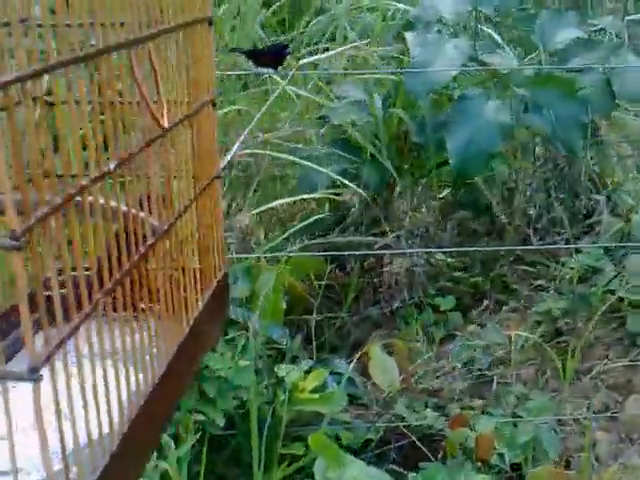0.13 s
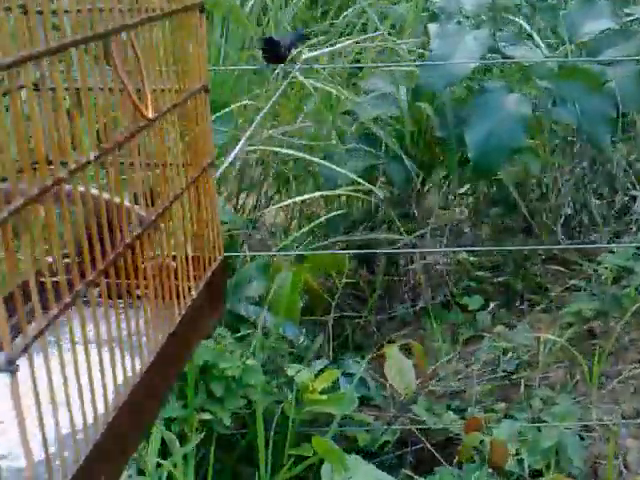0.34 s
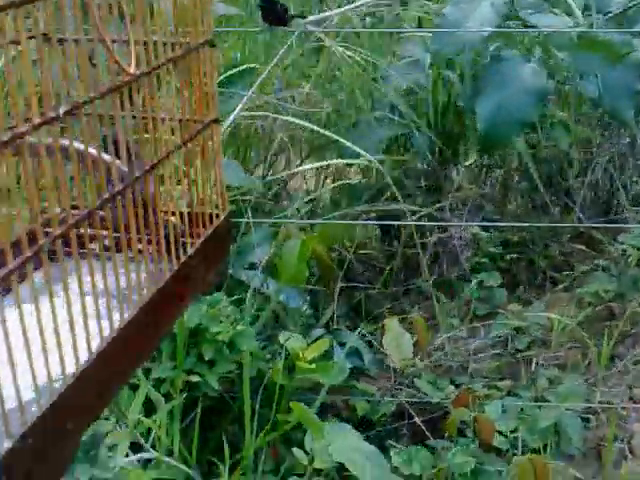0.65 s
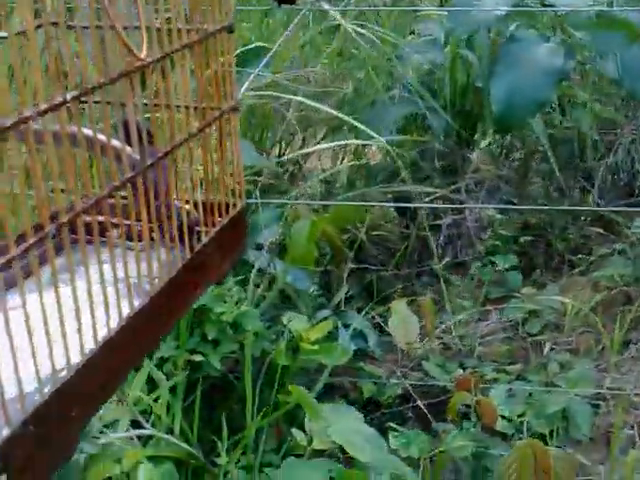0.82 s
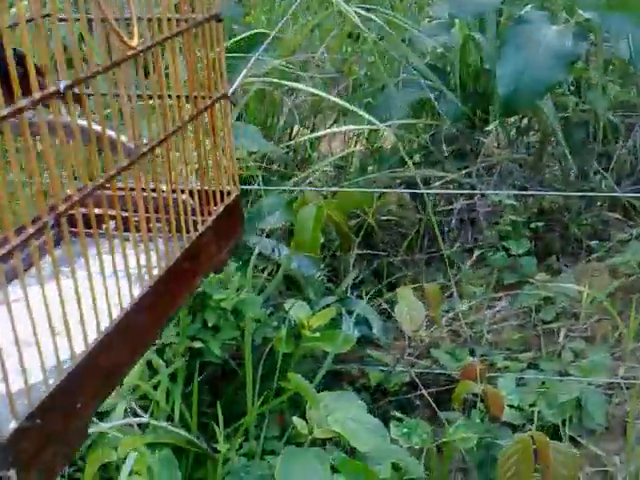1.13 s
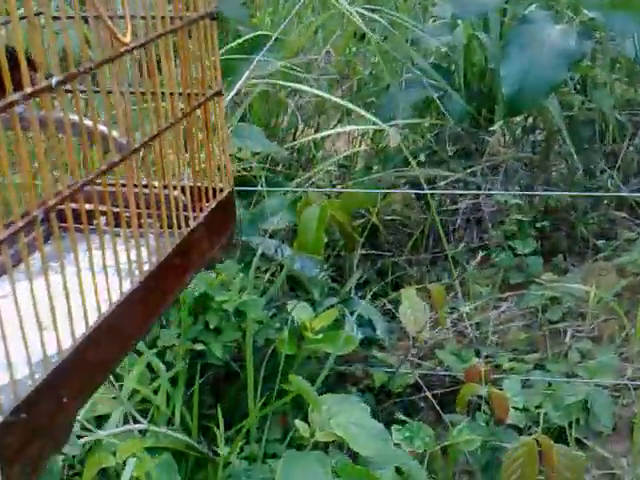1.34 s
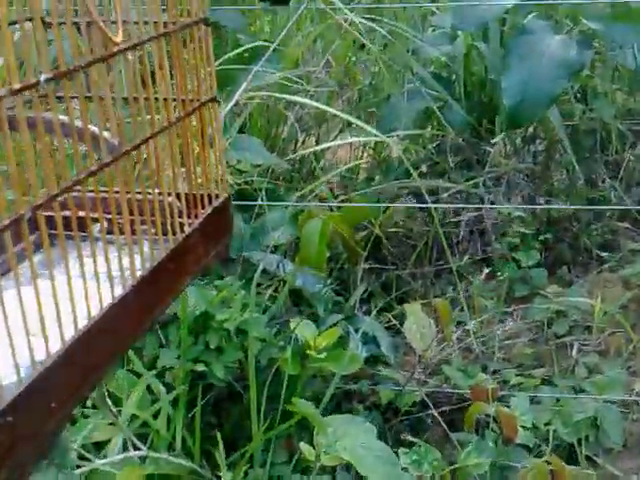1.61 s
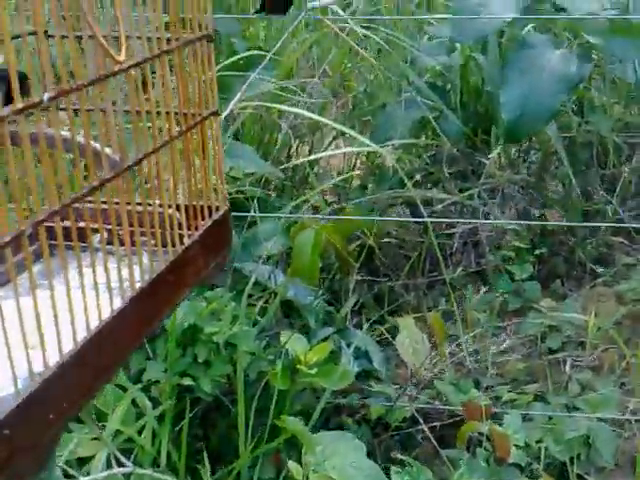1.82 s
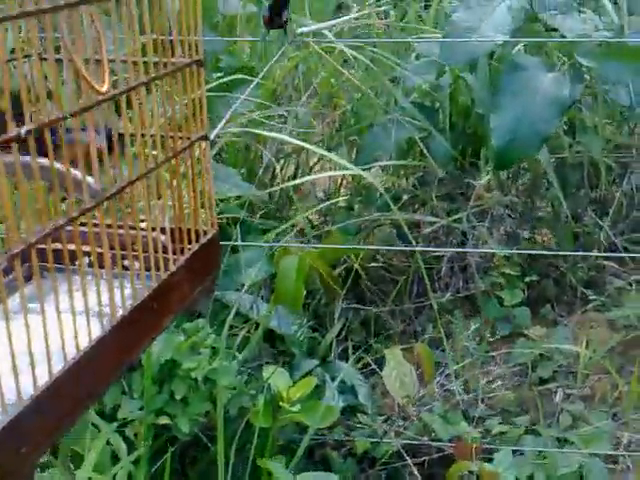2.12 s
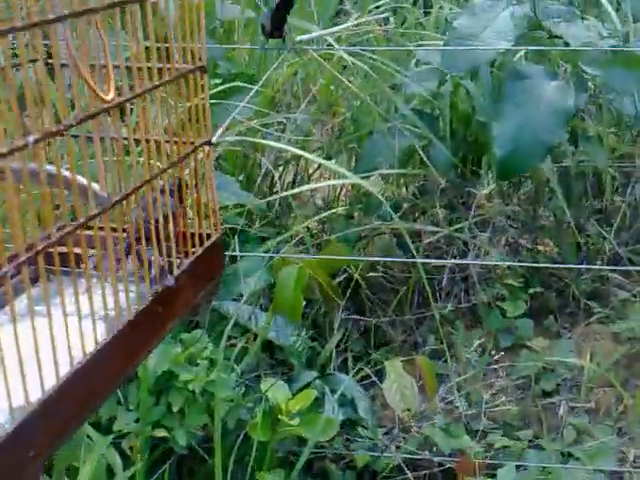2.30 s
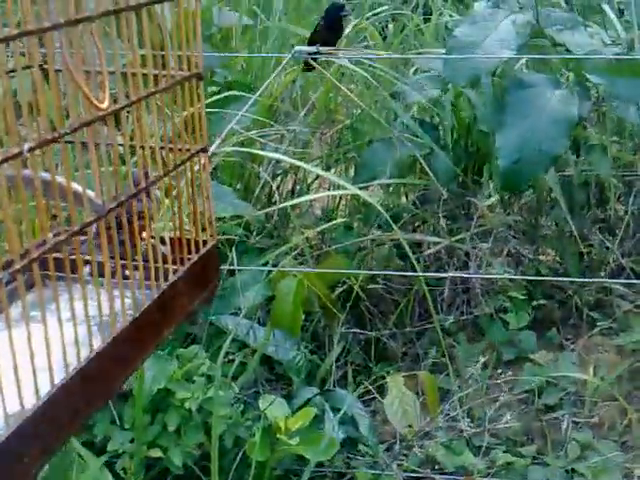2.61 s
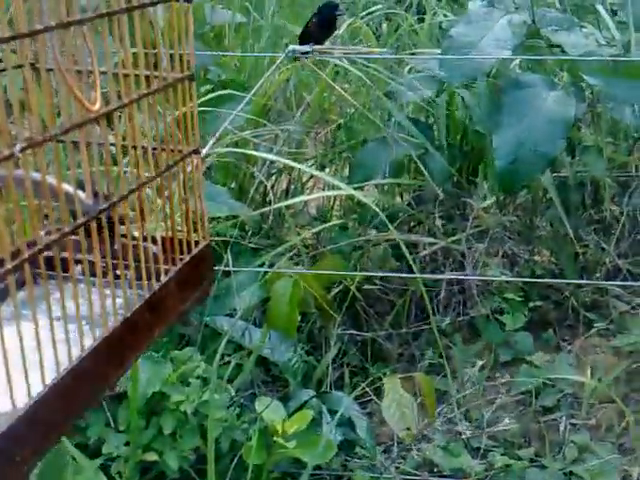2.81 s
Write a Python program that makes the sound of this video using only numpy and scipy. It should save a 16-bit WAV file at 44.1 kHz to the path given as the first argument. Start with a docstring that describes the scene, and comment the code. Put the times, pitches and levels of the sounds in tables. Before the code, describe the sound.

Sharp, kiss-like bird chips, close and dry, squeak downward into hiss: three at 0.2-0.6 s, four at 1.15-1.65, three at 2.3-2.7. A faint, farther whistle slides down from 0 to 0.4, another at 0.65. Low wind thumps the microphone, strongest around 0.5-0.9, easing after 1.6. Light wooden cage ticks, soft scuffs and tiny peeps follow; a thin high insect trill peaks near 2.35.

```python
"""A garden edge beside a bird cage. A falling whistle from a small, farther bird comes first, over faint outdoor air.
Soon three sharp, kiss-like chips sound close by: gliding squeaks that break into hiss, some opened by a smack.
Wind bumps the microphone through the first half, and a second whistle falls after the first three chips.
Runs of four and then three chips follow, with light cage ticks, soft scuffs and a few tiny peeps.
A high insect trill, one tone pulsed by wing strokes, rises and dips early on and is loudest towards the end."""
import sys
import numpy as np
from scipy import signal
from scipy.fft import rfft, irfft, next_fast_len
from scipy.io import wavfile
from scipy.ndimage import map_coordinates

SR = 44100
rng = np.random.default_rng(int(sys.argv[2]) if len(sys.argv) > 2 else 0)


def dump_mix(stems):
    """Bounce the given channels to the path in sys.argv[1] as a 16-bit WAV at rate SR."""
    frames = np.atleast_2d(stems).T  # one column per channel
    limited = np.clip(frames, -1, 1)  # hard clip at full scale
    pcm = np.round(limited * 32767).astype(np.int16)
    wavfile.write(sys.argv[1], SR, pcm)


N = 130095  # length in samples

# The close chips. Each row: moment of breaking up in seconds, then lists of times in seconds,
# pitches in Hz, squeak levels in dB and air levels in dB.
CHIPS = [
    [.246, (.211, .215, .223, .230, .241, .250, .258), (2450, 1950, 1550, 1210, 1000, 730, 510),
     (-48, -28, -25, -34.5, -26, -37, -44.5), (-23.5, -27, -27, -33, -33, -31.5, -38)],
    [.393, (.361, .371, .384, .393, .401, .410, .419, .429), (2080, 1780, 1520, 1600, 1330, 1250, 560, 420),
     (-40.5, -29.5, -23.5, -21, -29, -31, -37.5, -42), (-28, -28, -24.5, -22.5, -23, -28, -32, -35)],
    [.551, (.514, .521, .541, .552, .562, .572, .580, .587), (1280, 1320, 1180, 1280, 1580, 900, 480, 400),
     (-45, -39.5, -34.5, -31, -20.5, -33, -36, -46.5), (-42, -36, -25.5, -25, -21.5, -23, -30, -32.5)],
    [1.222, (1.147, 1.151, 1.164, 1.175, 1.188, 1.202, 1.211, 1.218),
     (1950, 2100, 1730, 1440, 1290, 1450, 1720, 2100), (-33, -33.5, -22.5, -31, -32.5, -37, -34, -47),
     (-32, -28, -28, -26.5, -25, -31.5, -30.5, -39)],
    [1.372, (1.290, 1.302, 1.310, 1.334, 1.354, 1.374, 1.385, 1.388),
     (1780, 1600, 1570, 1130, 1000, 1140, 1600, 1850), (-39.5, -28, -27, -32.5, -32, -42.5, -45, -38.5),
     (-28.5, -29, -25, -27, -35, -46, -43, -60)],
    [1.483, (1.455, 1.468, 1.480, 1.495, 1.508, 1.518), (1420, 1230, 1140, 970, 680, 440),
     (-44, -35, -34, -33.5, -42.5, -45.5), (-27.5, -29, -30, -33.5, -35.5, -35)],
    [1.647, (1.609, 1.624, 1.642, 1.659, 1.665, 1.684), (1340, 1200, 1040, 980, 720, 450),
     (-51, -42, -31, -37.5, -41, -61), (-41, -41, -33.5, -36.5, -28.5, -40.5)],
    [2.345, (2.319, 2.326, 2.333, 2.341, 2.349, 2.358), (1980, 1720, 1320, 970, 760, 520),
     (-29, -26, -29, -29, -38, -44), (-26.5, -25, -26.5, -31.5, -34, -35)],
    [2.506, (2.465, 2.472, 2.483, 2.495, 2.505, 2.520, 2.533, 2.540),
     (1800, 1400, 1120, 990, 910, 770, 480, 400), (-46, -45, -41, -30, -26.5, -36, -50, -60),
     (-34, -33.5, -33, -29, -31.5, -30.5, -33, -45)],
    [2.664, (2.636, 2.645, 2.668, 2.679, 2.690, 2.702, 2.715), (1600, 1280, 1070, 1110, 970, 720, 470),
     (-47, -47.5, -37.5, -35, -29.5, -47, -62), (-44, -30.5, -31, -31, -24, -28.5, -37.5)],
]
# The cavity that colours every squeak. Each row: frequency in Hz, relative level in dB.
CAVITY = [(400, 17), (750, -1.5), (1100, -0.5), (1800, 2), (2600, -6), (3200, -33.5), (5000, -37)]
# Overtones that the air drives until a chip breaks up. Each row: frequency in Hz, relative level in dB.
OVERTONES = [(1600, -14), (3000, -8), (3900, 0), (5000, -2), (6300, 0), (8000, -9), (11500, -7),
             (16000, -24)]
OVERTONE_DB = -5.5  # overtones against the air level
# Random pitch scatter as a share, random points per second, level scatter in dB.
JITTER, JITTER_RATE, SHIMMER_DB = .008, 900, 1.2
# Each overtone wanders in level (dB, up to about 1.5 times this when high) and phase (radians).
FLUTTER_DB, FLUTTER_RAD, FLUTTER_RATE = 2, 0.71, 115.2  # the last is random points per second
# Breaking up: time scale in seconds, extra pitch scatter as a share, depth of period doubling.
BREAK_S, ROUGH_JITTER, ROUGH_SPLIT = .003, .022, .3
EDGE_S, RELEASE_S = .002, .012  # fade in and fade out of a chip or whistle

# The hiss of the chips. Each row: frequency in Hz, relative level in dB per Hz.
HISS = [(300, -30), (800, -23), (1600, -0.5), (2900, -11.5), (4200, 0), (5200, -4.5), (6400, 1),
        (8000, -5.5), (10500, -1), (11700, 0.5), (12700, -1.5), (13600, -2.5), (15000, -14), (16500, 3)]
# The hollow low part of the hiss. Each row: frequency in Hz, relative level in dB per Hz.
HOLLOW = [(150, -3.5), (400, 3.5), (650, 12), (1000, -17), (2000, -22), (5000, -60)]
HOLLOW_HZ, HOLLOW_DB = 744, -12  # the hollow part enters as the pitch sinks below this
HISS_PULSING, CRACKLE_DB = 0.35, 1.1  # depth of hiss pulsing with the pitch, hiss scatter
# Below the treble, hiss is held down while the squeak is clean; the treble gains once it breaks.
CLEAN_HISS_DB, BROKEN_TREBLE_DB = -9, 1.5
# Below this air level in dB the treble fades, by so many dB for each dB, above about this Hz.
BRIGHT_DB, DULLING, TREBLE_HZ = -39, 0.84, 7900
SOFT_START_DB, OPENING_S = -23, 0.028  # a chip with no smack starts dull and opens up
# From this moment the hiss also has a narrow high resonance.
SIZZLE_FROM_S, SIZZLE_HZ, SIZZLE_WIDTH_HZ, SIZZLE_DB = 2, 12030, 680, -9.5

# Smacks that open the sharper chips. Each row: time in seconds, level in dB before SMACK_DB is added.
SMACKS = [(0.2103, -14.5), (0.3603, -15.5), (1.1463, -10), (1.2896, -15.5), (1.4543, -19.5), (2.317, -13)]
# How a smack rings. Each row: frequency in Hz, relative level in dB, time to fall 60 dB in seconds.
SMACK_MODES = [(1980, -5.5, 0.0073), (3860, 10.5, 0.0015), (5500, 13, 0.0024), (6700, 5.5, 0.0016),
               (9100, 11, 0.0028), (11570, 17, 0.0034)]
SMACK_LEAD_S, SMACK_RISE_S, SMACK_DB = 0.00018, 0.00028, -8.5  # the lead starts each smack early

# The falling whistles, one list each. Each row: time in seconds, pitch in Hz, level in dB.
WHISTLES = [
    [(0, 5780, -62), (.066, 4500, -61.5), (.12, 4020, -61), (.145, 3880, -45.5), (.21, 3585, -44),
     (.30, 3236, -43), (.385, 2950, -43)],
    [(.62, 4300, -64), (.638, 4100, -57), (.652, 3930, -46), (.71, 3540, -48), (.748, 3000, -60)],
]
# Tiny falling peeps. Each row: start in seconds, length in seconds, middle pitch in Hz, level in dB.
PEEPS = [(1.679, 0.0091, 3800, -43), (2.4, 0.011, 3290, -49.5), (2.413, 0.023, 3290, -50.5),
         (2.532, 0.011, 3980, -37), (2.714, 0.016, 3710, -42.5)]
PEEP_FALL, PEEP_JITTER = 0.068, .04  # fall over a peep and random scatter, as shares of its pitch
# The insect trill. Each row: time in seconds, pitch in Hz, level in dB.
TRILL = [(0, 7570, -78), (.5, 7430, -61), (.68, 7310, -51), (.95, 7300, -68.5), (1.4, 7390, -66),
         (1.85, 7560, -51), (2.35, 7505, -44), (2.95, 7500, -51)]
# Strokes per second, sounding share of a stroke, pitch fall in a stroke, random pitch scatter.
TRILL_RATE_HZ, TRILL_SHAPE, TRILL_SAG_HZ, TRILL_SCATTER_HZ = 74.2, 0.64, 40, 22.6

# Light knocks on the cage. Each row: time in seconds, level in dB before TICK_DB is added, favoured Hz.
TICKS = [(1.258, -26.5, 1100), (1.276, -42, 1550), (1.732, -37, 4170), (1.748, -36, 3200),
         (1.812, -35.5, 3860), (1.95, -36.5, 1370), (2.056, -23, 2440), (2.134, -34, 1610),
         (2.252, -29.5, 2500), (2.375, -34, 3000)]
# Resonances of the cage wood. Each row: frequency in Hz, width in Hz, relative level in dB.
TICK_MODES = [(1400, 620, 1.5), (2770, 230, -22), (3970, 290, -1.5), (8200, 6300, -11)]
TICK_RISE_S, TICK_T60_S, TICK_DB, TICK_SPREAD_OCT = 0.00056, 0.018, -6.5, 1  # T60: time to fall 60 dB
# Soft handling scuffs. Each row: middle in seconds, length in seconds, level in dB.
SCUFFS = [(1.27, 0.043, -39), (2.287, 0.037, -46.5)]
# Colour of the scuffs. Each row: frequency in Hz, relative level in dB.
SCUFF_COLOUR = [(80, -11), (220, 0.5), (400, -12), (600, -8), (1000, -16.5), (2500, -23.5), (8000, -39)]

# Wind on the microphone. Each row: time in seconds, level in dB.
WIND = [(0, -68), (.11, -69), (.14, -45.5), (.2, -59), (.3, -53), (.36, -45), (.44, -38), (.56, -29),
        (.7, -26.5), (.79, -38.5), (.92, -39), (.98, -32.5), (1.3, -36), (1.47, -42.5), (1.55, -54.5),
        (1.72, -47), (1.8, -58), (2.4, -62), (2.95, -64)]
# Colour of the wind. Each row: frequency in Hz, relative level in dB per Hz.
RUMBLE = [(15, -9), (35, 2.5), (75, 1), (130, -7.5), (200, -16.5), (300, -30), (500, -36.5), (1000, -55.5),
          (3000, -100)]
# Eddies that bump the microphone. Each row: middle in seconds, peak in dB, middle to peak in seconds.
BUMPS = [(0.377, -23.5, 0.0027), (0.467, -19.5, 0.0012), (0.577, -23.5, 0.0015), (0.654, -19.5, 0.0012),
         (0.683, -11.5, 0.0011), (0.825, -14.5, .0017), (0.854, -17, 0.0018), (1.025, -25.5, 0.0019),
         (1.075, -23, 0.0014), (1.334, -20, 0.0025), (1.437, -25, 0.0022), (1.465, -25, 0.0024),
         (1.587, -32.5, 0.004), (2.191, -42, 0.0034)]
# Still outdoor air. Each row: frequency in Hz, relative level in dB per Hz.
AIR = [(20, 5.5), (100, 2.5), (300, 0), (1000, -5), (1600, -1.5), (2400, -5.5), (4200, -5), (6000, -13.5),
       (7400, 4.5), (8400, -11), (12000, -14.5), (16000, -5)]
AIR_DB = -54.5
# A soft treble hiss that swells around the chips. Each row: time in seconds, level in dB.
SOFT_HISS = [(0, -115), (.2, -49.5), (.26, -42.5), (.35, -37.5), (.45, -53), (.62, -58), (1, -53.5),
             (1.14, -40), (1.26, -44.5), (1.55, -57), (1.9, -54)]

# Scatter from the foliage for near and far sounds: time to fall 60 dB, and level.
ECHO_T60_S, ECHO_DB, FAR_ECHO_T60_S, FAR_ECHO_DB = 0.096, -15, 0.35, -19.5
TOP_HZ, MIC_TOP = 16000, .45  # highest frequency kept, ceiling that rounds off peaks


def chips():
    """A gliding squeak rings a small cavity, then breaks into hiss that turns hollow as pitch sinks."""
    out, breath, hollow = np.zeros(N), noise(HISS), noise(HOLLOW)
    resonance = lambda f: 1 / (1 + ((f - SIZZLE_HZ) / SIZZLE_WIDTH_HZ) ** 2) ** 2
    sizzle = unit(filtered(rng.standard_normal(N), resonance))
    breath = breath + amp(SIZZLE_DB) * sizzle * (clock() > SIZZLE_FROM_S)
    top = filtered(breath, treble)
    body = breath - top
    for break_s, *columns in CHIPS:
        rows = np.transpose(columns)
        span = np.arange(SR // 6) + round((rows[0][0] - EDGE_S) * SR)
        t = span / SR
        hz, squeak_db, air_db = curves(rows, t)
        # Moves smoothly from 0 (clean) to 1 (broken up).
        broken = (1 + np.tanh((t - break_s) / BREAK_S / 2)) / 2
        dull = dull_db(t, air_db)
        tone, phase = squeak(t, hz, squeak_db, air_db, dull, broken)
        crackle = amp(CRACKLE_DB * wobble(JITTER_RATE, t))
        puffs = unit((1 + HISS_PULSING * np.cos(phase)) * crackle)
        hiss = amp(CLEAN_HISS_DB * (1 - broken)) * body[span]
        hiss += amp(BROKEN_TREBLE_DB * broken + dull) * top[span]
        hiss += amp(HOLLOW_DB) * hollow[span] / (1 + (hz / HOLLOW_HZ) ** 10)
        out[span] += gate(rows, t) * (tone + amp(air_db) * puffs * hiss)
    return out


def squeak(t, hz, squeak_db, air_db, dull, broken):
    """A buzzing edge and its phase: rich and clean at first, rough and bare once it breaks up."""
    phase = turn(hz * (1 + (JITTER + ROUGH_JITTER * broken) * wobble(JITTER_RATE, t)))
    k = np.arange(1, 21)[:, None]  # multiples of the pitch
    curves_per_partial = np.array([[wobble(FLUTTER_RATE, t) for _ in k] for _ in range(2)])
    wander, drift = curves_per_partial * (k > 1)  # the lowest partial stays steady
    flutter = amp(FLUTTER_DB * wander * (1.5 - 1 / k)) * (k * hz < TOP_HZ)
    low = amp(along(CAVITY, k * hz)) * flutter
    high = amp(along(OVERTONES, k * hz)) * flutter * (k > 1)
    # Even out the total strength, so the level curves alone set the loudness.
    low, high = [w / np.sqrt((w ** 2).sum(0) / 2) for w in (low, high)]
    air_drive = amp(air_db + OVERTONE_DB + dull * treble(k * hz)) * np.sqrt(1 - broken)
    weight = np.hypot(amp(squeak_db) * low, air_drive * high)
    partials = np.cos(k * phase + 2 * np.pi * rng.random(k.shape) + FLUTTER_RAD * drift)
    # At half the pitch: neighbouring cycles differ in strength.
    split = 1 + ROUGH_SPLIT * broken * np.cos(phase / 2 + drift[-1])
    shimmer = amp(SHIMMER_DB * wobble(JITTER_RATE, t))
    return (weight * partials).sum(0) * split * shimmer, phase


def dull_db(t, air_db):
    """Loss of treble when little air passes, and while a chip with no smack opens."""
    snaps = any(t[0] < s < t[0] + OPENING_S for s, _ in SMACKS)
    closed = 0 if snaps else np.maximum(1 - (t - t[0]) / OPENING_S, 0)
    return DULLING * np.minimum(air_db - BRIGHT_DB, 0) + SOFT_START_DB * closed


def treble(hz):
    """Share of a frequency that belongs to the treble."""
    return 1 - 1 / (1 + (hz / TREBLE_HZ) ** 10)


def smacks():
    """A few milliseconds of bright, fast-dying ringing as a chip snaps open."""
    out = np.zeros(N)
    t = np.arange(SR // 20) / SR
    for s, db in SMACKS:
        ring = np.zeros(len(t))
        for hz, level, t60 in SMACK_MODES:
            cycles = hz * rng.normal(1, 0.0082) * t + rng.random()  # slightly detuned each time
            ring += amp(level - 60 * t / t60) * np.sin(2 * np.pi * cycles)
        start = round((s - SMACK_LEAD_S) * SR)
        out[start:][:len(t)] += amp(db + SMACK_DB) * ring * np.minimum(t / SMACK_RISE_S, 1) ** 2
    return out


def whistles():
    """Pure, slightly wavering notes that slide down."""
    t, out = clock(), np.zeros(N)
    for rows in WHISTLES:
        hz, db = curves(rows, t)
        level = amp(db + 2.6 * wobble(72.5, t))
        tone = np.sqrt(2) * np.sin(turn(hz * (1 + 0.0037 * wobble(120.0, t))))
        out += gate(rows, t) * level * tone
    return out


def peeps():
    """Very short, falling notes, made scratchy by fast random pitch scatter."""
    t, out = clock(), np.zeros(N)
    for s, length, hz, db in PEEPS:
        u = np.clip((t - s) / length, 0, 1)  # progress through the peep
        pitch = hz * (1 - PEEP_FALL * (u - .5) + PEEP_JITTER * wobble(JITTER_RATE, t))
        out += amp(db) * np.sqrt(2) * np.sin(np.pi * u) * np.sin(turn(pitch))
    return out


def insect():
    """One high tone, pulsed by each wing stroke and sagging in pitch within it."""
    t = clock()
    hz, db = curves(TRILL, t)
    stroke = (TRILL_RATE_HZ * t) % 1  # progress through the stroke
    pulse = np.maximum(np.sin(np.pi * np.minimum(stroke / TRILL_SHAPE, 1)), 0) ** 0.3
    pitch = hz - TRILL_SAG_HZ * (stroke - .5) + TRILL_SCATTER_HZ * wobble(250, t)
    return amp(db + 0.69 * wobble(39.5, t)) * unit(pulse * np.sin(turn(pitch)))


def wood(f):
    """Resonances of the wooden cage: each is strongest at its own frequency."""
    return sum(amp(db) * (f * w) ** 2 / ((c * c - f * f) ** 2 + (f * w) ** 2) for c, w, db in TICK_MODES)


def ticks():
    """Small dry contacts ring the wooden cage, each favouring the modes near its own pitch."""
    out = np.zeros(N)
    for s, db, hz in TICKS:
        age = clock() - s
        fade_db = -60 * np.maximum(age, 0) / TICK_T60_S
        level = amp(db + TICK_DB + fade_db) * np.clip(age / TICK_RISE_S + 1, 0, 1)
        colour = lambda f: wood(f) / (1 + (np.log2((f + 1) / hz) / TICK_SPREAD_OCT) ** 2)
        out += level * unit(filtered(rng.standard_normal(N), colour))
    return out


def scuffs():
    """Brief dull rubs: low-coloured noise that swells and fades."""
    t = clock()
    level = sum(amp(db) * np.exp(-(2 * (t - s) / length) ** 2) for s, length, db in SCUFFS)
    return noise(SCUFF_COLOUR) * level


def wind():
    """Low rumble, and single eddies that suck and then push on the microphone."""
    t = clock()
    db, = curves(WIND, t)
    out = amp(db + 3.5 * wobble(30, t)) * noise(RUMBLE)
    for s, peak_db, width in BUMPS:
        u = (t - s) / width
        out += amp(peak_db) * u * (4 / (3 + u * u)) ** 2  # a dip, then an equal peak
    return out


def air():
    """Steady outdoor air and a soft swelling hiss, both coloured noise."""
    db, = curves(SOFT_HISS, clock())
    return amp(AIR_DB) * noise(AIR) + amp(db) * noise(HISS)


def foliage(x, t60):
    """A short scatter of the sound: many random reflections that die away."""
    t = np.arange(SR // 3) / SR
    tail = rng.standard_normal(len(t)) * amp(-60 * t / t60)
    return signal.fftconvolve(x, tail / np.linalg.norm(tail))[:N]


def amp(db):
    """Turn dB into a plain multiplier."""
    return 10 ** (np.asarray(db) / 20)


def clock():
    """Seconds at each sample."""
    return np.arange(N) / SR


def unit(x):
    """Scale to an average strength (rms) of 1."""
    return x / np.sqrt(np.mean(x ** 2) + 1e-20)


def along(points, hz):
    """Read a table of frequency and value, with frequency on a log axis."""
    f, v = np.transpose(points)
    return np.interp(np.log(hz + 1), np.log(f + 1), v)


def curves(rows, t):
    """Each column after the time, at the times t."""
    s, *cols = np.transpose(rows)
    return [np.interp(t, s, c) for c in cols]


def wobble(rate, t):
    """A smooth random curve through so many random points per second."""
    u = (t - t[0]) * rate
    return map_coordinates(rng.standard_normal(int(u[-1]) + 4), [u])


def filtered(x, response):
    """Strengthen or weaken each frequency of x by response(frequency)."""
    m = next_fast_len(N + SR // 2)
    return irfft(rfft(x, m) * response(np.fft.rfftfreq(m, 1 / SR)), m)[:N]


def noise(spectrum):
    """Coloured noise of rms 1."""
    return unit(filtered(rng.standard_normal(N), lambda hz: amp(along(spectrum, hz))))


def turn(hz):
    """Running phase of a moving pitch."""
    return 2 * np.pi * np.cumsum(hz) / SR


def gate(rows, t):
    """Open from the first row to the last, with a quick rise before and a short fall after."""
    rise, fall = (t - rows[0][0]) / EDGE_S, (rows[-1][0] - t) / RELEASE_S
    return np.clip(np.minimum(rise, fall) + 1, 0, 1) ** 2


def scene():
    """Add up the near sounds, the far bird's whistles with the tiny peeps, their scatter and the background."""
    near, far = chips() + smacks() + ticks(), whistles() + peeps()
    near_echo = amp(ECHO_DB) * foliage(near, ECHO_T60_S)
    far_echo = amp(FAR_ECHO_DB) * foliage(far, FAR_ECHO_T60_S)
    return (near + far + near_echo + far_echo + insect() + wind() + scuffs() + air())[None]


def record(dry):
    """Round off the sharpest peaks and keep nothing above the band limit."""
    held = dry[0] / (1 + (dry[0] / MIC_TOP) ** 6) ** (1 / 6)
    return filtered(held, lambda hz: hz < TOP_HZ)[None]


dry = scene()
out = record(dry)
dump_mix(out)
```